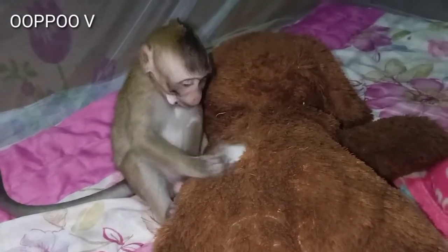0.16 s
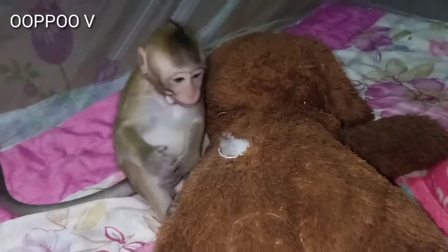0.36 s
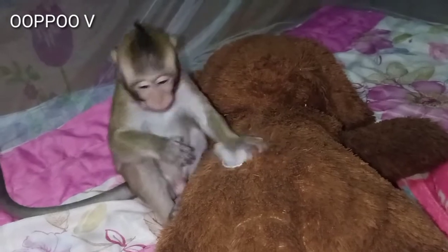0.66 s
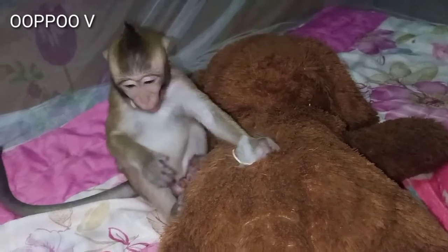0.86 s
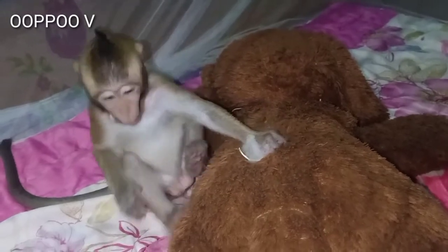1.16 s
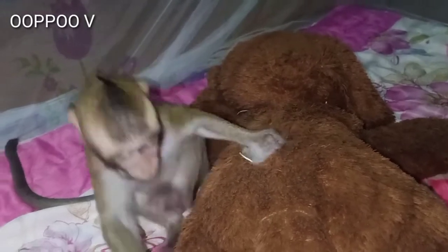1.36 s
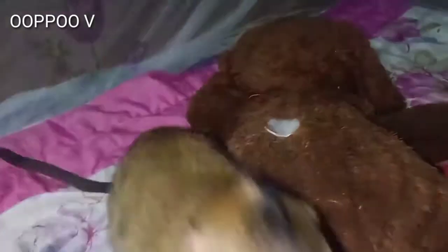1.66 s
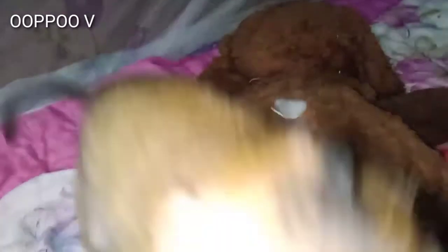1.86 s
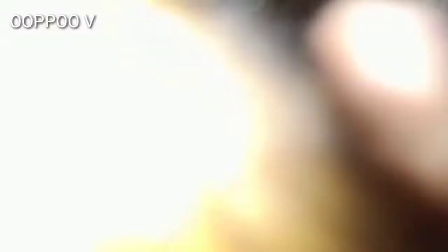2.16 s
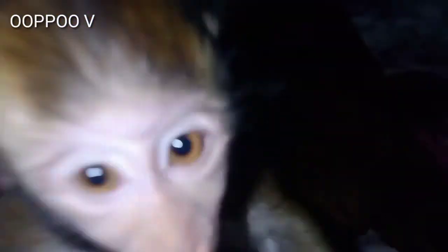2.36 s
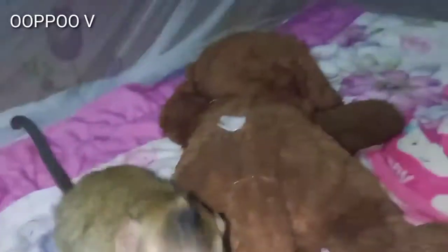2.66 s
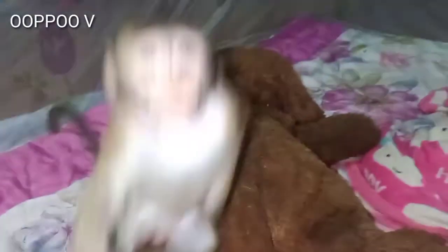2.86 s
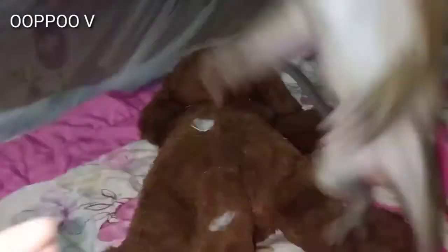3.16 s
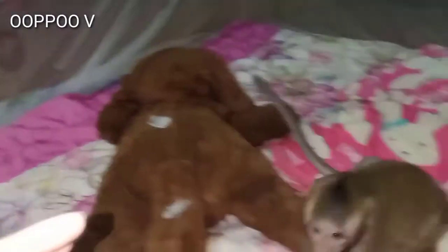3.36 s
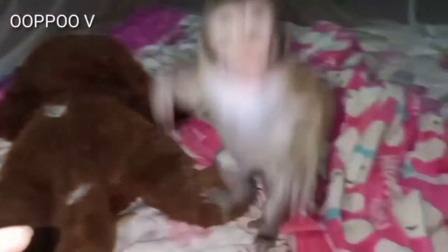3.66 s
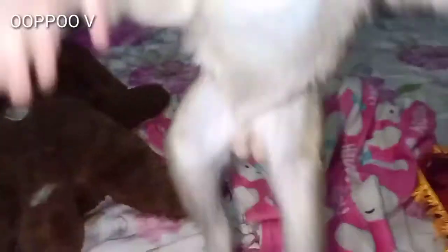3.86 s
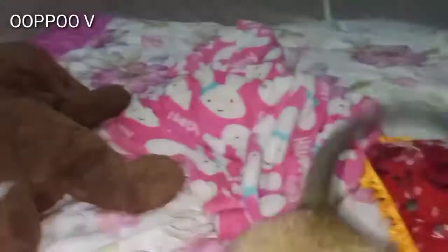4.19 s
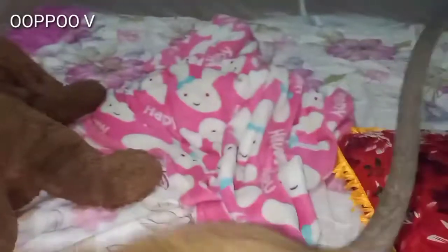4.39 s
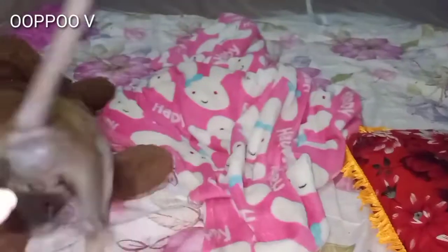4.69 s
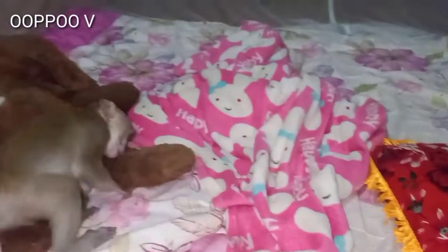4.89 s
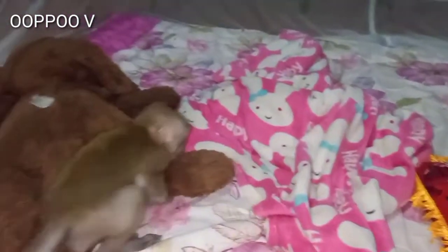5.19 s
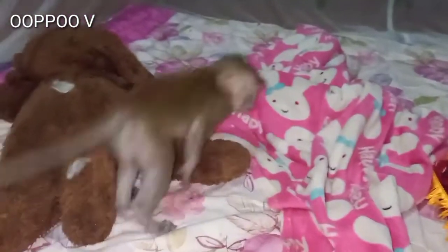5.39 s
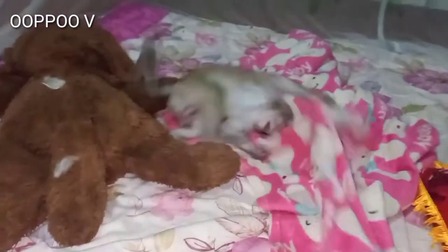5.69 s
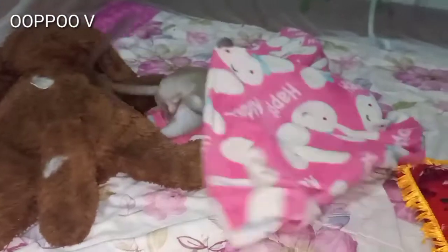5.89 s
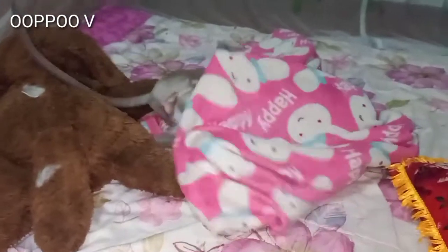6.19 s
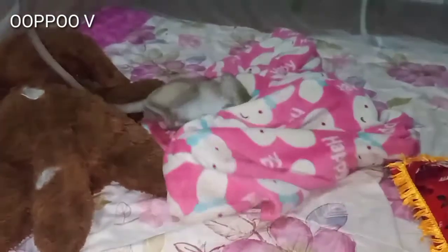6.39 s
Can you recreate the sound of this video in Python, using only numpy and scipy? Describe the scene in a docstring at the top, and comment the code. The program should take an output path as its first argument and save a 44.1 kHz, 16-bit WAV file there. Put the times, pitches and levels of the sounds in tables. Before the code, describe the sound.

A low, steady fan hum, gentle room hiss and faint pulsing crickets fill a still bedroom. Very close and mostly on the left, a small monkey's claws click sharply on the phone in quick succession while its fur rasps over the microphone. Scattered light taps and a second, weaker flurry come next. A blanket slides, barely audible, and a single knock lands on the right near the end.

```python
"""A slow fan hums and throbs in a quiet bedroom at night, air hisses softly and crickets outside chirp
in step by scraping their wings. After about two seconds a small monkey grabs at the hand-held phone:
claws knock on the case amid brief rasps, most of them fur dragging over the two microphone holes
(the ports). A few more touches follow, and near four seconds a sliding blanket whispers."""
import sys
import numpy as np
from scipy import signal
from scipy.fft import rfft, irfft, next_fast_len
from scipy.io import wavfile
from scipy.ndimage import uniform_filter1d

SR = 44100
rng = np.random.default_rng(int(sys.argv[2]) if len(sys.argv) > 2 else 0)


def generate_wav(sig):
    """Save sig (samples, or channels by samples) to the path in sys.argv[1] as 16-bit PCM at SR."""
    pcm = np.round(np.clip(np.atleast_2d(sig).T, -1, 1) * 32767).astype(np.int16)
    wavfile.write(sys.argv[1], SR, pcm)


N = 288414


def undb(db):
    """Turn decibels into a number to multiply by."""
    return 10 ** (np.asarray(db) / 20)


def level(x, db):
    """Scale a sound to an average (rms) level."""
    return x * undb(db) / np.sqrt(np.mean(x ** 2))


def ring(x, *bands):
    """Pass a sound through resonances in a row, each given as (pitch [Hz], width [Hz])."""
    for hz, width_hz in bands:
        x = signal.lfilter(*signal.iirpeak(hz, hz / width_hz, SR), x)
    return x


def wander(rate):
    """A smooth random wiggle, roughly 1 in size, with `rate` new values a second."""
    hold = int(SR / rate)
    steps = np.repeat(rng.standard_normal(N // hold + 1), hold)
    return 0.92 * uniform_filter1d(uniform_filter1d(steps, hold), hold)[:N]


def sides(pan_db):
    """Left and right volume; the nearer port keeps the full level."""
    return undb([[min(pan_db, 0.)], [min(-pan_db, 0.)]])


# The lowest hum and the tone just above that makes it throb: (time [s], hum [dB], side tone [dB])
FAN_THROB = [(0, -57, -72), (2.0, -58.5, -77), (3.4, -62, -66), (4.8, -60.5, -70.5), (6.54, -62, -67.5)]
# Weaker side tones from the blades: (pitch [times the hum], shift [times the fan speed], level [dB])
BLADE_TONES = [(1, -2, -77), (1, -1, -79), (2, -1, -81), (2, 1, -84)]
# Higher hum tones, before and after the phone turns:
# (pitch [times the hum], before [dB], after [dB], delay on the right [radians])
OVERTONES = [(2, -72, -74, 0.23), (3, -66.5, -73, 0.51), (4, -81.5, -77.5, 1.54), (5, -74, -76, 0.25),
             (6, -73.5, -72.5, 1.6), (7, -75, -70.5, 1.14), (8, -79.5, -77, 0.38), (9, -80.5, -79.5, 1.8),
             (10, -96, -84, 2.2), (12, -79, -82.5, 2.18)]
def fan(t):
    """The motor hums at twice the mains rate; each turn of the fan rocks it, adding a throb."""
    hum_hz, turn_s, phone_turning_s = 100.51, .2584, (2.87, 4.44)
    times, motor_db, side_db = np.transpose(FAN_THROB)
    hum = 2 * np.pi * hum_hz * t
    turn = 2 * np.pi * (t - .31) / turn_s
    motor_gain = undb(np.interp(t, times, motor_db) + np.array([[-.5], [.5]]))  # left, right
    side_gain = undb(np.interp(t, times, side_db) + np.array([[1.2], [-1.2]]))
    out = motor_gain * np.sin(hum) + side_gain * np.sin(hum + turn + 0.2 * wander(1.5))
    for multiple, shift, db in BLADE_TONES:
        gain = undb(db + 0.87 * wander(1.9))
        out += gain * np.sin(multiple * hum + shift * turn + 0.274 * wander(5.1))
    # overtones come by other paths and reach the ports out of step
    for multiple, before_db, after_db, lag in OVERTONES:
        db = np.interp(t, phone_turning_s, (before_db, after_db)) + 2.0 * wander(16) + 2.5 * wander(4)
        phase = multiple * hum + 2 * np.pi * rng.random() + 0.64 * wander(6.1)
        out += undb(db) * np.sin(phase - np.array([[0], [lag]]))
    return np.sqrt(2) * out


# How strong the room's hiss is from low to high: (pitch [Hz], relative level [dB])
AIR_COLOUR = [(20, -35), (50, -26), (82, -13), (101, -8.5), (125, -13), (270, -20), (460, -23.5),
              (750, -22), (1500, -32), (3600, -40.5), (6500, -39), (9500, -45), (12300, -36.5),
              (14500, -54.5), (15400, -81)]
# Pitches the ports boost or cut: (pitch [Hz], width [Hz], boost [dB])
PORT_COLOUR = [(2360, 1290, 12), (4840, 3600, 12), (8770, 850, 8), (12340, 870, -23.5), (3660, 690, -5)]
# The slow swell of the air: (time [s], relative level [dB])
AIR_SWELL = [(0, 2.5), (2.1, 2), (2.6, 0), (4, 1.5), (6.54, 1.16)]
def air(t):
    """Room noise in half-octave slices that each flicker alone; both ports hear much the same bass."""
    air_db, right_lag_s = -61, .00018
    size = next_fast_len(N)
    hz = np.arange(size // 2 + 1) * SR / size + 1e-3
    pitches, levels = np.transpose(AIR_COLOUR)
    db = np.interp(np.log(hz), np.log(pitches), levels)
    db += sum(boost / (1 + (2 * (hz - centre) / width) ** 2) for centre, width, boost in PORT_COLOUR)
    alike = 1 / (1 + (hz / 1000) ** 2) - .14
    shared, opposed = rfft(rng.standard_normal((2, size))) * undb(db) * np.sqrt([1 + alike, 1 - alike])
    pair = np.array([(shared + opposed) * np.exp(2j * np.pi * hz * right_lag_s), shared - opposed])
    swell_db = np.interp(t, *np.transpose(AIR_SWELL))
    out = np.zeros((2, N))
    for octave in np.arange(4.5, 14.5, .5):
        window = np.cos(np.pi * np.clip(np.log2(hz) - octave, -.5, .5)) ** 2
        gain = undb(swell_db + 0.42 * wander(27) + 0.39 * wander(2.96))
        out += gain * irfft(pair * window, size)[:, :N]
    return level(out, air_db) * undb([[.4], [-.4]])


# One cricket a row: (wing pitch [Hz], width [Hz], strokes [per s], base level [dB])
CRICKETS = [(5830, 160.6, 41, -72.5), (5500, 260, 93, -83), (5680, 190, 47, -73.5), (4830, 320, 25, -92)]
# What still sounds between chirps: (time [s], strength [factor])
BETWEEN_CHIRPS = [(0, 0.33), (2, 0.29), (2.6, 0.18), (6.54, 0.19)]
# How all the crickets rise and fall together: (time [s], boost [dB])
CHORUS_SWELL = [(0, 1.2), (1.2, 0), (2.6, 2), (3.6, 2), (4.6, 0.5), (5.4, 2), (6.54, 3.5)]
def crickets(t):
    """Each stroke scrapes a wing and makes it ring; the crickets chirp in step, from all around."""
    first_chirp_s, chirp_every_s = .096, .2262
    tone_share, stroke_depth = 0.57, 0.32  # strokes are shallow because echoes fill the gaps
    cycle = 2 * np.pi * (t - first_chirp_s) / chirp_every_s
    pulse = .5 + .5 * np.cos(cycle + 0.25 * np.cos(cycle))  # starts faster than it fades
    chirp = np.interp(t, *np.transpose(BETWEEN_CHIRPS)) + 1.1 * pulse ** 0.73
    out = np.zeros((2, N))
    for hz, width_hz, rate, db in CRICKETS:
        strokes = 1 + stroke_depth * np.cos(2 * np.pi * rate * t + 3.54 * wander(6))
        scrape = ring(rng.standard_normal((2, N)), *[(hz, width_hz)] * 3)
        wavering_hz = hz + 0.3 * width_hz * np.array([wander(150), wander(150)])
        tone = np.sin(2 * np.pi * np.cumsum(wavering_hz, axis=1) / SR)
        wings = np.sqrt(tone_share) * level(tone, 0) + np.sqrt(1 - tone_share) * level(scrape, 0)
        out += level(wings * strokes * chirp * undb(0.64 * wander(5.3)), db)
    return out * undb(np.interp(t, *np.transpose(CHORUS_SWELL)))


# Brief rasps; the faint one at 1.982 s leads into a loud knock, and the others are fur on a port:
# (start [s], length [s], base level [dB], change by the end [dB],
# bass [dB], fizz [dB], highest fizz [dB], left minus right [dB])
RASPS = [(1.887, 0.013, -46, 0, 7.5, -11, -14, -4), (1.901, 0.031, -38.5, -11.5, 2, -10, -19, -2.5),
         (1.929, 0.035, -55, -8, -2, -7, -13, -2), (1.963, 0.01, -44, -4, -6, -14, -20, -6),
         (1.972, 0.0096, -43.5, -3, -2, -14, -24, -7), (1.982, 0.022, -46.5, 0, -6, -15, -21, 4),
         (1.998, 0.035, -52, -4, -2, -7.5, -20, -11), (2.006, 0.014, -39.5, 2.5, -19, -14, -28, 22),
         (2.024, 0.046, -55.5, 6, -1, -5, -14, 9), (2.052, 0.019, -48, -9, -5, -10, -24, 8),
         (2.068, 0.04, -47.5, 15.5, -3, -10, -10, 24), (2.109, 0.011, -28, -11, -5, -7, -9, 44),
         (3.751, 0.014, -48.5, 1, 1, -12, -24, 11), (3.764, 0.024, -43.5, -4, -3, -16, -22, 11),
         (3.787, 0.01, -47, 1, 6, -7.5, -12, 13), (3.793, 0.015, -42.5, -16, 3.5, -14, -10, 15),
         (5.552, 0.026, -59, -5, -5, -12, -6, -8), (5.604, 0.05, -65.5, 1, -8, -10, -11, -8)]
def rasps(t):
    """Uneven clicks, like slipping hairs, ring the hollow of a port; each port gets its own clicks."""
    fade_s, top_hz = 0.002, 11700
    clicks = rng.standard_normal((2, N)) * undb(3.6 * np.minimum(rng.exponential(size=(2, N)), 5))
    hollow = level(ring(clicks, *[(2220, 1500)] * 3), 0)
    bass = level(ring(clicks, (960, 860), (350, 710)), 0)
    treble = level(ring(clicks, (4800, 3900), (6600, 3740)), 0)
    top = level(ring(clicks, (top_hz, 4440), (top_hz, 4700), (top_hz, 5600)), 0)
    out = np.zeros((2, N))
    for start, length, db, change_db, bass_db, fizz_db, top_db, pan_db in RASPS:
        on = slice(int(start * SR), int((start + length) * SR))
        since = t[on] - start
        fade = np.clip(np.minimum(since, length - since) / fade_s, 0, 1)
        gain = fade * undb(db + change_db * since / length)
        fizz = undb(fizz_db) * treble[:, on] + undb(top_db) * top[:, on]
        out[:, on] += sides(pan_db) * gain * (hollow[:, on] + undb(bass_db) * bass[:, on] + fizz)
    return out


def swing(t, hz, cycles, rise):
    """One short vibration that peaks at t = 0 and dies away quickly."""
    width = np.where(t < 0, rise, .8) * cycles
    return np.exp(-(t * hz / width) ** 2) * np.cos(2 * np.pi * hz * t)


# Claws hitting the case: (time [s], base level [dB], pitch [Hz], ring length [cycles],
# build-up [share of the ring], swing back [dB], tick [dB], left minus right [dB])
CLAW_KNOCKS = [(1.8924, -26.5, 1540, 1.4, .45, -20, -5, 15), (1.8975, -16, 640, 0.61, 0.49, -32, -31, 8),
               (1.902, -28, 1200, 0.85, .45, -22, -20, -22), (1.9665, -31, 1700, 1.3, .45, -30, -20, -16),
               (1.9724, -27.5, 363, 0.42, 0.51, -30, -35, 14), (1.99, -35, 2300, 0.8, .45, -30, -14, 16),
               (1.9961, -1.5, 1935, 0.8, 0.84, -26, -20.5, 20.5),
               (1.9978, -27.5, 940, 1.8, 0.45, -40, -37, 20), (2.0107, -32, 2000, 1.9, .45, -34, -8, 19),
               (2.016, -31, 2400, 1.6, .45, -34, -28, 20), (2.0256, -36, 2100, 1.5, .45, -32, -22, 16),
               (2.0551, -16.5, 2960, 0.65, 0.42, -8.5, -10.5, 17),
               (2.0601, -25, 3600, 0.59, .45, -29, -23, 20), (2.1027, -1.5, 1900, 0.73, .55, -8, -18.5, 39),
               (2.1046, -16, 2300, 0.56, 0.42, -20, -12, 35), (2.106, -21.5, 1520, 0.54, .45, -19, -11, 35),
               (2.112, -19, 2600, 1.2, 0.5, -9, -25, 40), (2.1095, -5.5, 1560, 0.43, 0.67, -4, -18, 43),
               (2.186, -37.5, 2210, 0.75, .45, -27, -27, -14), (2.347, -47, 2600, 1.5, .45, -28, -20, 16),
               (2.3780, -47, 2900, 1.2, .45, -28, -20, 6), (2.4190, -52, 2400, 1.2, .45, -28, -20, 10),
               (2.5760, -40.5, 2810, 0.99, .45, -27, -20, 15), (2.971, -51, 9000, 2.4, .45, -24, -9, 5),
               (3.002, -46, 3200, 0.76, .45, -30, -5, 5), (3.057, -47, 3300, 1.2, .45, -30, -20, 7),
               (3.7438, -27, 2300, 0.8, 0.49, -11, -15, 19), (3.7465, -27.5, 465, 2.6, .3, -30, -40, 8),
               (3.7477, -23.5, 1870, 0.6, .45, -31, -15, 16), (3.776, -30, 1890, 1.3, .45, -25, -22, 21),
               (3.7962, -25.5, 2400, 1.1, .45, -20, -18, 27), (3.7968, -38, 4500, 1.6, 0.55, -30, -15, 20),
               (3.7963, -30, 393, 1.8, 0.38, -30, -35, 9), (3.7995, -18.5, 960, 0.58, 0.34, -10, -28, 25),
               (3.8420, -38.5, 327, 0.58, .45, -27, -35, 12), (5.458, -47, 2600, 0.76, .45, -30, -22, -4),
               (5.542, -13.5, 1470, 0.42, 0.54, -8, -15.5, -11.5),
               (5.5446, -34.5, 199, 0.61, 0.61, -40, -40, -14), (5.5955, -52, 4100, 3.5, .6, -30, -20, -6)]
def claw_knocks():
    """The case gives a short swing and a dull swing back; the claw tip adds a bright tick."""
    lead = 200  # samples before each peak
    t = np.arange(-lead, 800) / SR
    snaps = (t == 0) + 0.18 * rng.standard_normal((len(CLAW_KNOCKS), len(t)))  # a click with some grit
    swing_back = swing(t - 0.00066, hz=673, cycles=0.5, rise=0.57)
    out = np.zeros((2, N))
    for (time, db, hz, cycles, rise, back_db, tick_db, pan_db), snap in zip(CLAW_KNOCKS, snaps):
        case = swing(t, hz, cycles, rise) - undb(back_db) * swing_back
        tip_hz = 6400 if pan_db > 0 else 6900  # each port colours the tick its own way
        tip = ring(snap, (tip_hz, 4000), (tip_hz, 4700))
        sparkle = ring(snap, (10400, 3840), (9400, 5200))
        tick = np.exp(-(t / 0.00056) ** 2) * (tip + 0.3 * sparkle)
        near = case + undb(tick_db) * tick / np.abs(tick).max()
        # the blow travels through the case and reaches the other port later, ringing its hollow
        far = np.roll(0.29 * case - 2.0 * ring(near, (2050, 1600), (2060, 1590)), 6)
        pair = np.array([near, far] if pan_db > 0 else [far, near])
        push = np.sign(pan_db)  # blows from the right push the case the other way
        start = int(time * SR) - lead
        out[:, start:start + len(t)] += push * sides(pan_db) * undb(db) * pair
    return signal.lfilter(*signal.butter(2, 110, "high", fs=SR), out)


def through_ports(touches):
    """Ports weaken pitches just above their own ring; the narrower right one also dulls the touches."""
    left, right = touches - 0.48 * ring(touches, (3330, 560))
    return np.array([left, signal.sosfilt(signal.butter(3, 11300, fs=SR, output="sos"), right)])


# The blanket shifting: (time [s], level [dB])
BLANKET_RUSTLE = [(3.9, -94), (3.98, -81.5), (4.15, -86), (4.35, -87), (4.5, -99)]
def blanket(t):
    """Cloth fibres whisper high up while the blanket slides."""
    hiss = ring(rng.standard_normal((2, N)), (9500, 4000), (9500, 5000))
    fibres = level(hiss * undb(5.5 * wander(45)), 0)
    return fibres * undb(np.interp(t, *np.transpose(BLANKET_RUSTLE), left=-140, right=-140))


def scene():
    """Add up the room's sounds and the knocks and rasps at the phone."""
    t = np.arange(N) / SR
    touches = through_ports(claw_knocks() + rasps(t))
    return fan(t) + air(t) + crickets(t) + touches + blanket(t)


def record(dry):
    """The phone cuts off the very highest pitches."""
    top_hz = 15900
    return signal.sosfilt(signal.ellip(8, .2, 70, top_hz, fs=SR, output="sos"), dry)


dry = scene()
out = record(dry)
generate_wav(out)
```